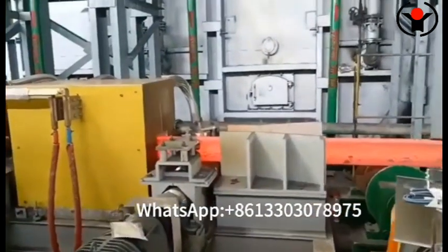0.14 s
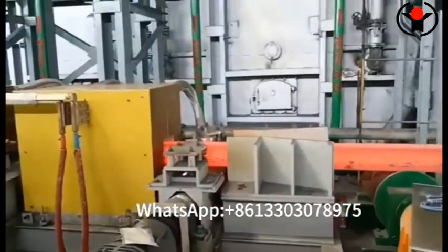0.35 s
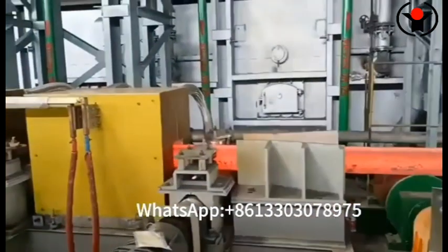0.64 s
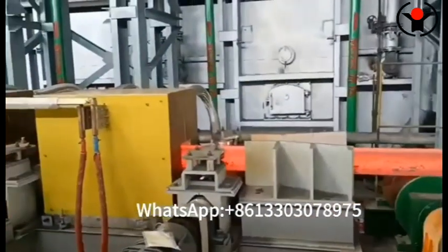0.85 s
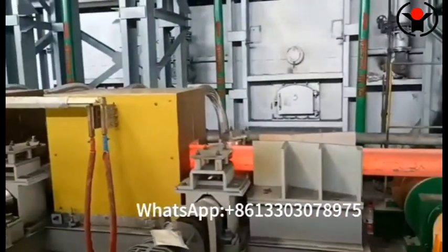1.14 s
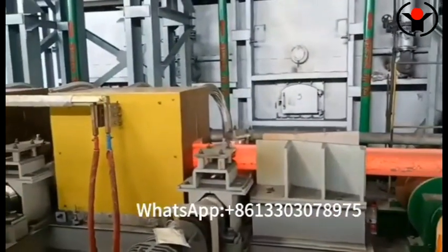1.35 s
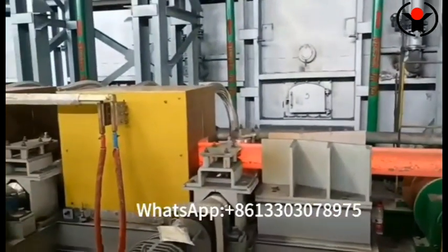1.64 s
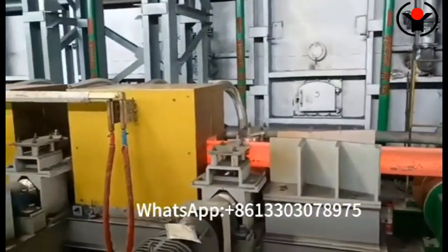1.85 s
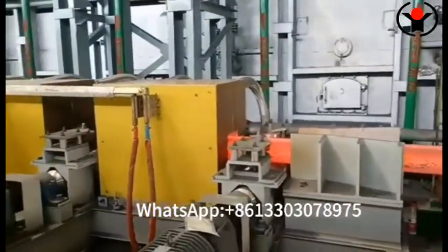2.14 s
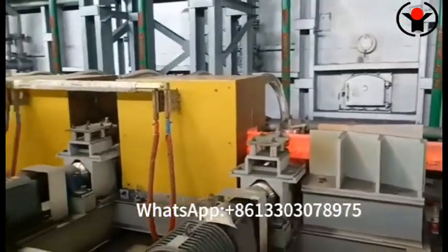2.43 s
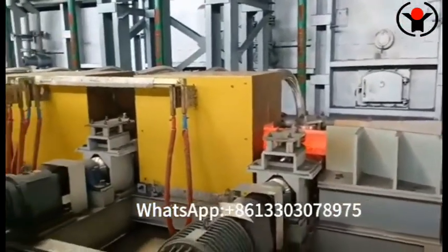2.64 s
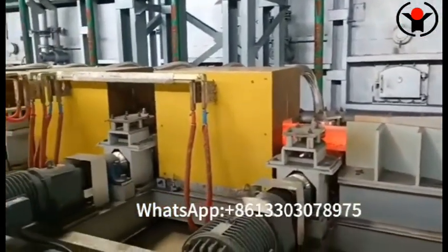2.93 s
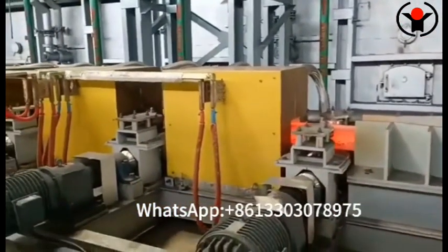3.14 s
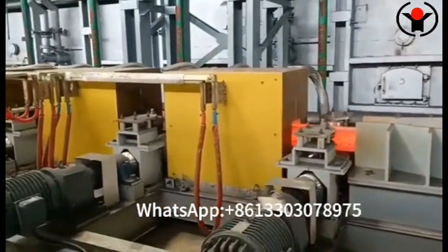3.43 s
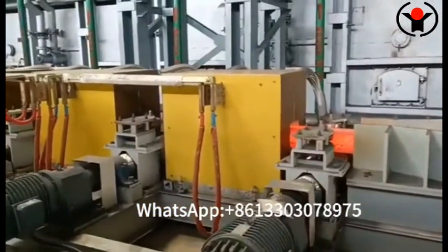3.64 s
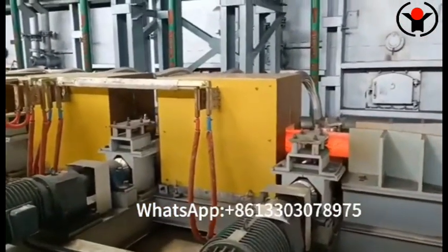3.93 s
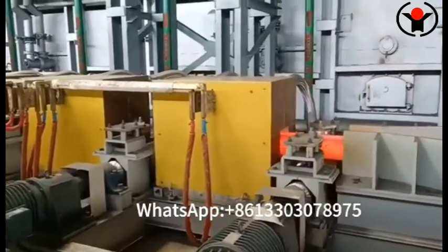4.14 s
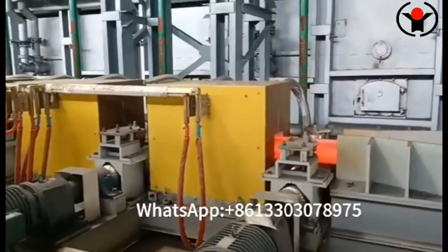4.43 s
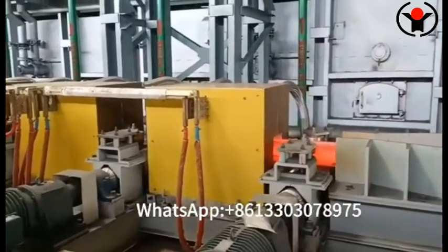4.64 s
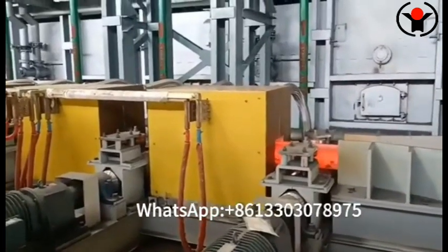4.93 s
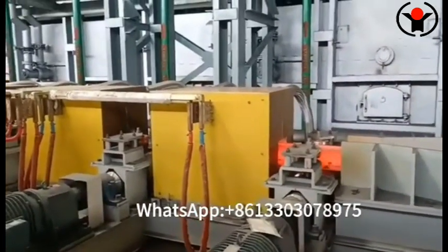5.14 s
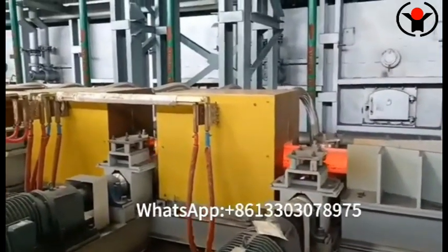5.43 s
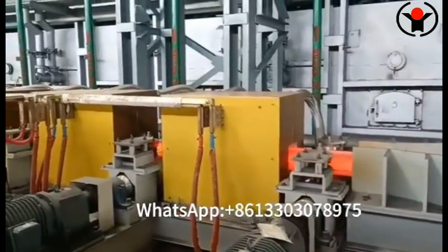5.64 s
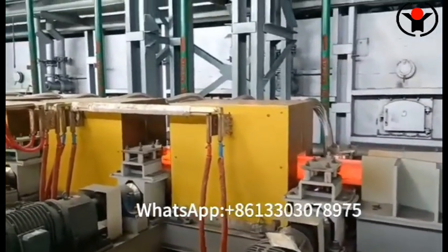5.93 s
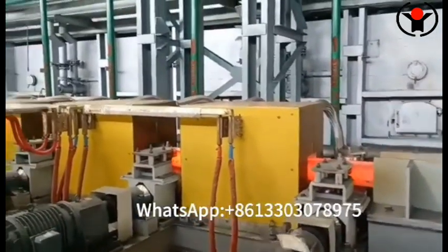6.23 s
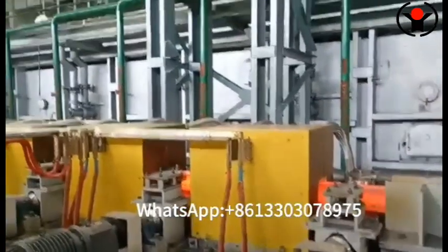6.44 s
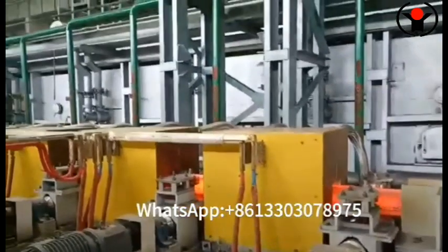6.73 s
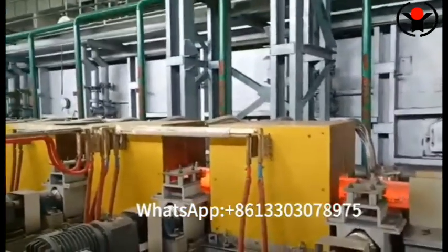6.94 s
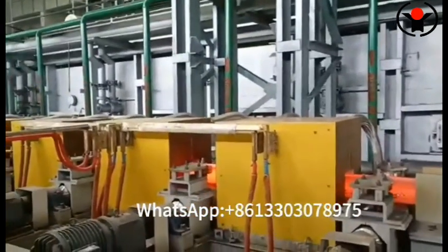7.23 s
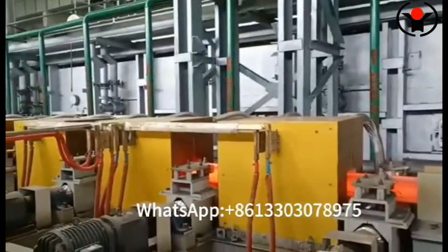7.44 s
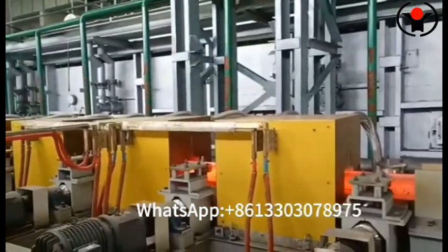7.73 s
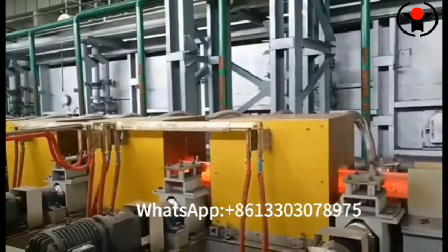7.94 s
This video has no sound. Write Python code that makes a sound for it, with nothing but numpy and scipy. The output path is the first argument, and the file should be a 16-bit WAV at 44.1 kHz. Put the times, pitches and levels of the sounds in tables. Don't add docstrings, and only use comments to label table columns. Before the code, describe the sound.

A handheld phone hears an induction heating line a few metres away in a steel hall. From 0 s a piercing near whine at about 1500 Hz sounds over uneven roller rumble, dull clatter, motor drone, transformer hum and faint cooling hiss. A second, blurrier coil tone at a fixed, slightly lower pitch swells clearest around 0.6 s, making the whine beat and roughen. Until 3.4 s the near tone fades in and out while creeping upward, with a tiny dropout at 1.6 s and weak moments near 0.8, 2.2 and 3.3 s. From about 3.6 s it stands loud and piercing, settling near 1554 Hz from 4.5 s, with gentle wavering and flickering higher overtones. A brief rumble surge comes near 5.6 s. After 7 s the pitch climbs slightly again to the end at 8 s. Treble is thin and patchy.

```python
import sys
import numpy as np
from scipy import signal
from scipy.fft import rfft, irfft, next_fast_len
from scipy.io import wavfile
from scipy.ndimage import uniform_filter1d, minimum_filter1d

SR = 44100
rng = np.random.default_rng(int(sys.argv[2]) if len(sys.argv) > 2 else 0)


def digitize_waveform(pressure):
    field = np.atleast_2d(pressure).T
    bounded = np.clip(field, -1, 1)
    quanta = np.round(bounded * 32767).astype(np.int16)
    wavfile.write(sys.argv[1], SR, quanta)


def attenuation_scalar(level_db):
    decades = np.asarray(level_db, float) / 20
    return 10 ** decades


N = 355887
TIME = np.arange(N) / SR

# time_s, gain_db
PHONE_GAIN = [(0, -0.8), (.38, 1), (.52, 4), (.88, 2.5), (1.02, -2), (1.95, -3), (2.49, -4.5), (2.74, -3),
              (3.18, -4.5), (3.33, 2.5), (3.87, 2.5), (4.3, 3), (4.7, 4), (5.1, 3), (5.65, 2.5),
              (6.17, -0.26), (7.5, 0), (8.07, -0.5)]


def columns(table):
    s, *cols = np.transpose(table)
    return [np.interp(TIME, s, c) for c in cols]


def bump(s, width_s):
    return np.exp(-((TIME - s) / width_s) ** 2)


def walk(rate_hz):
    hold = int(SR / rate_hz)
    steps = np.repeat(rng.standard_normal(N // hold + 1), hold)
    return 1.22 * uniform_filter1d(uniform_filter1d(steps, hold), hold)[:N]


def noise(shape):
    size = next_fast_len(N)
    spectrum = rfft(rng.standard_normal(size)) * shape(np.fft.rfftfreq(size, 1 / SR) + 1e-9)
    x = irfft(spectrum, size)[:N]
    return x / np.sqrt(np.mean(x ** 2))


def band(centre_hz, width_hz):
    re, im = (noise(lambda f: 1 / (1 + (2 * f / width_hz) ** 2)) for _ in range(2))
    return (re + 1j * im) * np.exp(2j * np.pi * centre_hz * TIME)


def machines():
    # level_db, share_of_phone_gain
    base_levels = [
        (-34.5, 1.19),
        (-37.5, 1.23),
        (-40, .85),
        (-46, 0.96),
    ]
    # time_s, change_db, half_width_s
    machine_surges = [
        [(.04, 4.5, 0.05), (.47, 2, 0.06), (.87, -1, 0.032), (1.34, -4.5, .045), (2.74, 5.5, .055),
         (3.03, 5.5, .07), (3.25, -2.5, 0.73), (3.59, 4.5, .09), (4.25, 2.5, .06), (4.94, -4.5, 0.043),
         (5.18, -2.5, 0.065), (5.57, 8, 0.035), (6.21, -6.5, .04), (7.81, -3.5, .05)],
        [(.27, 3.5, .05), (.7, 5, 0.046), (.9, -2, 0.32), (2.27, 4, .03), (3.03, -7.5, 0.022), (3.39, 2, .05),
         (4.73, 5.5, 0.088), (5.62, 2, .04), (7.48, 2, 0.31)],
        [(.58, 2.5, .1), (2.92, -4, .02), (3.03, -10.5, 0.016), (3.12, -2.5, .03), (3.39, 2.5, .05),
         (4.02, -4.5, .06)],
        [(.27, -2, .12), (.61, 4, .038), (.86, 2.5, 0.027), (2.14, -3, 0.035), (2.92, -3.5, 0.14),
         (3.38, 3.5, 0.055), (6.9, 1.5, 0.46)],
    ]
    gain_db = columns(PHONE_GAIN)[0]
    levels_db = []
    for (db, share), surges in zip(base_levels, machine_surges):
        swell_db = sum(change * bump(s, w) for s, change, w in surges)
        levels_db.append(db + share * gain_db + swell_db)
    return levels_db


def hall(levels_db):
    # pitch_hz, density_db (per Hz)
    hall_colour = [(25, -29.5), (50, -17.5), (80, -8), (150, -0.5), (300, -4.5), (500, -8.5), (800, -9.5),
                   (1100, -14), (2200, -13), (3600, -16), (5400, -18.5), (7000, -18), (7800, -25)]
    # pitch_hz, width_hz, level_db (against the rumble)
    hum_lines = [(147.8, 2.5, -14.5), (302.4, 13, -13), (365, 12, -19), (632, 12, -20), (193, 5.3, -21),
                 (765, 60, -15.5), (879, 46, -17)]
    colour_hz, colour_db = np.transpose(hall_colour)
    swings = np.array([level - level.mean() for level in levels_db])
    owner_hz, owner = np.log([350, 550, 1100, 1700, 3000, 4500]), [0, 1, 1, 2, 2, 3]
    gust = 1.5 * walk(16)
    out, power = 0, 0
    for centre in 25 * 2 ** np.arange(0, 8.6, 1 / 3):
        log_hz = np.log(centre)
        bell = lambda f: np.cos(np.pi / 2 * np.clip(3 * np.log2(f / centre), -1, 1))
        gain = attenuation_scalar(np.interp(log_hz, np.log(colour_hz), colour_db)) * np.sqrt(centre)
        shares = np.maximum(1 - abs(np.interp(log_hz, owner_hz, owner) - np.arange(4)), 0)
        slew = int(SR * 80 / centre ** 1.6) + 1
        swing = (1 + 12 / centre) * uniform_filter1d(shares @ swings, slew)
        lumps = np.interp(log_hz, np.log([100, 3000]), [3.2, 1.8]) * walk(9) + .4 * gust
        out = out + gain * attenuation_scalar(swing + lumps) * noise(bell)
        power += gain ** 2 * (60 < centre < 450)
    hum = sum(attenuation_scalar(db + swings[0] / 2) * band(f, w).real for f, w, db in hum_lines)
    return attenuation_scalar(levels_db[0].mean()) * (out / np.sqrt(power) + hum)


def whine_dips():
    # time_s, depth_db, half_width_s
    short_dips = [
        (1.612, -17.5, 0.0062),
        (2.945, -2.5, 0.012),
        (3.035, -0.5, 0.0089),
    ]
    return attenuation_scalar(sum(db * bump(s, w) for s, db, w in short_dips))


def overtones(rest_db, overtone_swells):
    size = [attenuation_scalar(db + columns(PHONE_GAIN)[0]) for db in rest_db]
    for s, multiple, db, w in overtone_swells:
        i = round(multiple) - 2
        size[i] = size[i] + attenuation_scalar(db) * bump(s, w)
    return [20 * np.log10(a) for a in size]


def coil(hz, levels_db, side, skirt_db, skirt_hz, node_gain=lambda k: 1):
    # multiple, near_db, far_db
    weak_orders = [
        (.5, -54.5, -63),
        (5, -59.5, -81.5),
    ]
    # offset_hz, width_hz, near_db, far_db (under the tone)
    supply_ripple = [
        (-36, 9.9, -42, -26.5),
        (35.5, 4.9, -32.5, -18.5),
        (90.5, 75, -39, -36.5),
    ]
    turn = 2j * np.pi * np.cumsum(hz) / SR
    fringe = attenuation_scalar(skirt_db) * band(0, skirt_hz)
    for offset_hz, width_hz, *ripple_db in supply_ripple:
        fringe += attenuation_scalar(ripple_db[side]) * band(offset_hz, width_hz)
    out = 0
    for k, db in enumerate(levels_db, 1):
        calm = attenuation_scalar(uniform_filter1d(db, SR // 2))
        shake_db = (.35 if k == 1 else 1.8) * walk(14)
        size = attenuation_scalar(db + shake_db) * node_gain(k) + calm * np.roll(fringe, k * SR)
        out = out + size * np.exp(k * turn)
    for multiple, *weak_db in weak_orders:
        out = out + attenuation_scalar(weak_db[side] + 1.5 * walk(3)) * np.exp(multiple * turn)
    return np.sqrt(2) * out.real


def far_coil():
    # time_s, level_db
    whine_levels = [(0.0, -38.5), (0.3, -29), (0.59, -17.5), (1.08, -24.5), (2.13, -27), (2.66, -24),
                    (3.18, -33.5), (3.37, -27), (3.77, -36), (4.79, -35.5), (5.56, -26.8), (6.88, -36.5),
                    (7.79, -28), (8.06, -34.5)]
    # time_s, multiple, peak_db, half_width_s
    overtone_swells = [(0.04, 3, -48.6, 0.05), (0.21, 2, -49, 0.18), (1.37, 3, -55.5, 0.13), (2.17, 3, -52, 0.22),
                       (2.21, 2, -46.4, 0.14), (2.67, 2, -45, 0.05), (3.25, 3, -54, 0.08), (3.29, 2, -37.5, 0.13),
                       (3.95, 2, -39.3, 0.34), (5.23, 2, -36, 1.11), (7.27, 3, -53, 0.51), (7.63, 2, -37.5, 0.7)]
    levels_db = columns(whine_levels) + overtones([-47, -52], overtone_swells)
    return coil(np.full(N, 1484.3), levels_db, side=1, skirt_db=-17, skirt_hz=48.6)


def nodes(multiple):
    # time_s, multiple, half_width_s
    wave_nodes = [(.17, 3, .04), (.21, 2, .04), (.41, 3, 0.025), (.7, 3, 0.025), (.74, 2, 0.025),
                  (.76, 4, .03), (1.33, 3, .04), (1.681, 2, 0.025), (1.79, 3, .06), (1.99, 2, 0.065),
                  (2.268, 1, 0.09), (2.78, 2, 0.086), (2.79, 3, .04), (3.0, 3, 0.034), (3.3, 3, 0.042),
                  (3.338, 1, 0.055), (3.46, 4, 0.054), (3.82, 2, 0.04), (4.1, 2, 0.028), (5.2, 2, 0.019),
                  (4.64, 3, 0.049), (5.72, 4, 0.072), (5.98, 3, 0.026), (6.55, 4, .04), (6.7, 2, 0.021),
                  (6.98, 3, 0.044), (7.52, 4, .03), (7.7, 4, 0.044)]
    return np.prod([np.tanh((s - TIME) / w) for s, k, w in wave_nodes if k == multiple], axis=0)


def near_coil():
    # time_s, pitch_hz
    whine_pitch = [(0, 1495.79), (0.4, 1501.89), (0.62, 1503.9), (0.8, 1505.0), (1.05, 1510.49),
                   (1.3, 1513.86), (1.47, 1515.47), (1.7, 1521.45), (1.95, 1523.17), (2.4, 1531.38),
                   (3, 1540.38), (3.6, 1547.68), (4, 1551.88), (4.5, 1553.87), (5.3, 1554.1), (7, 1554.53),
                   (7.5, 1557.59), (8.07, 1563.54)]
    # time_s, level_db
    whine_levels = [(0, -14.5), (.28, -14), (.42, -20), (.6, -15), (.8, -29), (.98, -18), (1.16, -21.5),
                    (1.33, -26), (1.68, -22.5), (1.92, -19.5), (2.2, -29.5), (2.45, -17), (2.85, -16),
                    (3.25, -22), (3.7, -11.5), (4.4, -13), (5.3, -11.5), (8.07, -12.5)]
    # time_s, change_db, half_width_s
    hand_sways = [(2.78, 3, 0.03), (2.98, 3, 0.018), (3.06, 3, .015), (3.41, 2.5, 0.062), (3.5, -3.5, 0.05),
                  (3.7, 1, .05), (3.95, 3.5, 0.065), (4.1, 0, .06), (4.4, -2, 0.066), (4.68, -1.5, 0.053),
                  (5.1, -0.3, .1), (5.8, 0.6, 0.18), (6.15, 0.2, .06), (6.4, 1.2, .12), (6.75, -1, .1),
                  (7.06, -2, 0.09), (7.38, 0.5, .06), (7.48, -1, .04), (7.63, 4, .1), (7.8, 3, .12)]
    # time_s, multiple, peak_db, half_width_s
    overtone_swells = [(.04, 3, -40, .054), (.05, 2, -35, 0.11), (.29, 3, -46, 0.044), (.33, 2, -34, 0.018),
                       (.52, 3, -36, 0.069), (.57, 2, -27.5, 0.08), (.63, 4, -36.5, .058), (.81, 3, -38, .059),
                       (.86, 4, -39.5, .04), (.87, 3, -37.5, 0.56), (.97, 2, -36, 0.84), (1.84, 2, -43, 0.083),
                       (2.36, 2, -35, 0.44), (2.36, 3, -44, 0.49), (3.43, 2, -23, .13), (3.62, 2, -30, 0.092),
                       (3.64, 3, -37.5, .12), (3.63, 4, -41, 0.16), (3.9, 3, -43.5, 0.8), (3.96, 2, -37.5, 0.036),
                       (4.15, 4, -41, 0.45), (5.06, 2, -28, 1.56), (5.25, 4, -47, .3), (5.49, 3, -39.5, .54),
                       (6.3, 4, -47, .12), (6.95, 2, -39, 0.11), (7.3, 4, -46, .22), (7.9, 4, -46.5, 0.12),
                       (7.94, 2, -27.5, .58), (8.15, 3, -42, 1.5)]
    whine_db = columns(whine_levels)[0] + sum(db * bump(s, w) for s, db, w in hand_sways)
    levels_db = [whine_db] + overtones([-60.5, -62, -51], overtone_swells)
    return coil(*columns(whine_pitch), levels_db, side=0, skirt_db=-26.0, skirt_hz=61, node_gain=nodes)


def scene():
    background = hall(machines())
    whines = far_coil() + near_coil()
    return (whines * whine_dips() + background)[None]


def patchy_treble(x):
    # band_start_hz, dropped_share, slipped_through_share
    patches = [(0, 0, 0), (1750, .03, 0), (1950, .03, 0), (2200, .03, 0), (2500, .03, 0), (2800, .03, 0),
               (3200, .05, 0), (3450, .05, 0), (3750, .05, 0), (4100, .05, 0), (4400, .04, 0),
               (4750, .07, 0), (5200, .07, 0), (5700, .07, 0), (6400, .16, 0), (7000, .2, 0), (7600, .3, 0),
               (7850, .2, .14), (8250, .2, .06), (8600, .28, .04), (9000, .05, .27), (9600, .04, .03),
               (10200, .03, 0), (11000, .02, 0), (12000, .04, 0), (13000, .04, 0), (14400, 0, 0)]
    # pitch_hz, level_db (against its source)
    copy_levels = [(7900, -33.5), (9400, -36), (10200, -27), (11600, -25), (12000, -33), (13700, -36),
                   (14300, -32.5), (14600, -23.5), (15500, -25.5)]
    size = 1280
    edge_hz, shift_hz = 7850, 3900
    drop_db, slip_db, patchy_db = -26, 20, 5
    sieve, flatten = 0.9, .45
    hz, _, z = signal.stft(x, SR, "cosine", size, size // 2)
    smooth = uniform_filter1d(np.log(abs(z) + 1e-12), size=16, axis=0)
    height = abs(z) / np.exp(minimum_filter1d(smooth, size=13, axis=0))
    z[height < sieve] = 0
    bins, edge = round(shift_hz / hz[1]), round(edge_hz / hz[1])
    for lo, step, press in ((edge + bins, 2 * bins, 1), (edge, bins, flatten)):
        pressed = z / np.maximum(height / 3.4, 1) ** press
        z[lo:lo + bins] = pressed[lo - step:lo - step + bins]
    z[edge + 2 * bins:] = 0
    loudness = uniform_filter1d(abs(z[edge:]).mean(axis=0), size=5)
    z[edge:] *= np.sqrt(loudness.mean() / loudness)
    grain = np.repeat(rng.standard_normal((len(hz) // 8 + 1, z.shape[1])), 8, axis=0)[edge:len(hz)]
    copy_db = np.interp(hz[edge:], *np.transpose(copy_levels))[:, None]
    z[edge:] *= attenuation_scalar(copy_db + patchy_db * grain)
    start_hz, dropped, slipped = np.transpose(patches)
    patch = np.searchsorted(start_hz, hz, "right") - 1
    luck = rng.random((patch.max() + 1, z.shape[1]))
    for axis in (0, 1):
        luck = np.where(rng.random(luck.shape) < .45, np.roll(luck, 1, axis=axis), luck)
    tone = uniform_filter1d(1. * (height > 8), size=5, axis=0) > 0
    lost = luck[patch] < dropped[patch, None] * loudness.mean() / loudness
    leaked = luck[patch] > 1 - slipped[patch, None]
    z[lost & ~tone] *= attenuation_scalar(drop_db)
    z[leaked & ~tone] *= attenuation_scalar(slip_db)
    return signal.istft(z, SR, "cosine", size, size // 2)[1][:N]


def roll_off(x):
    return signal.sosfilt(signal.butter(12, 15720, fs=SR, output="sos"), x)


def record(dry):
    mix = patchy_treble(dry[0])[None]
    return roll_off(mix)


dry = scene()
out = record(dry)
digitize_waveform(out)
```